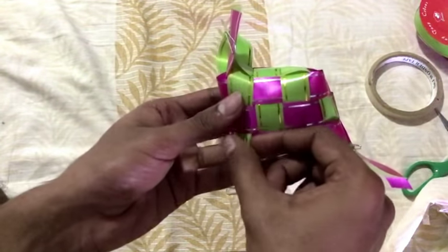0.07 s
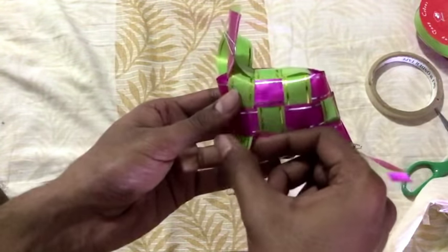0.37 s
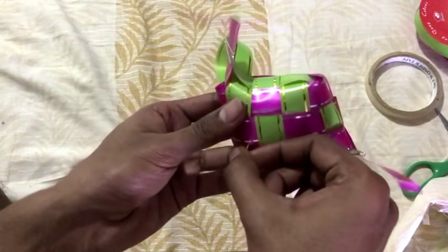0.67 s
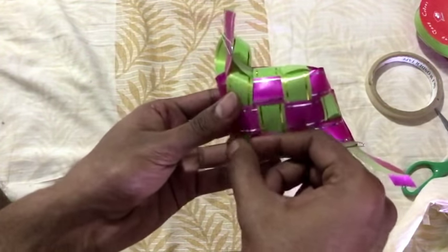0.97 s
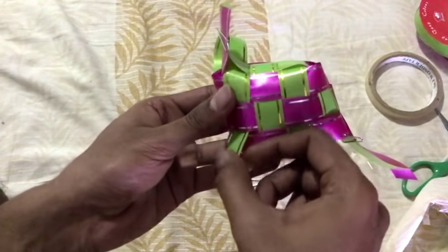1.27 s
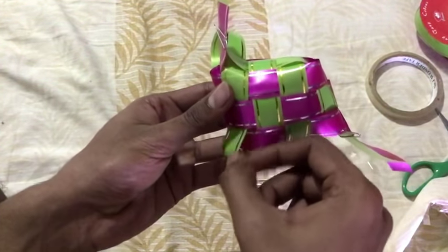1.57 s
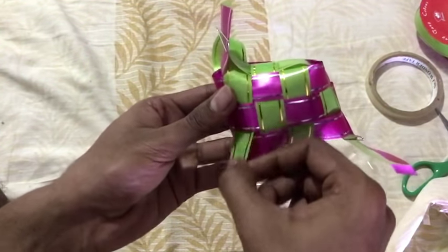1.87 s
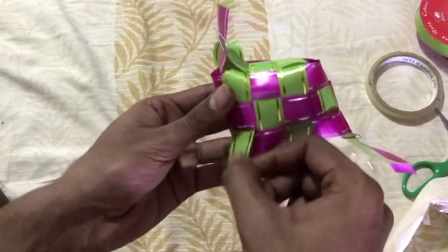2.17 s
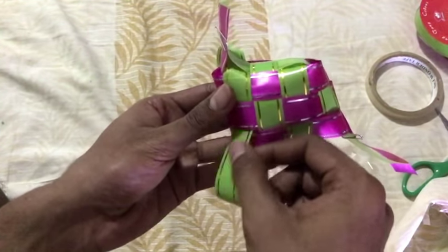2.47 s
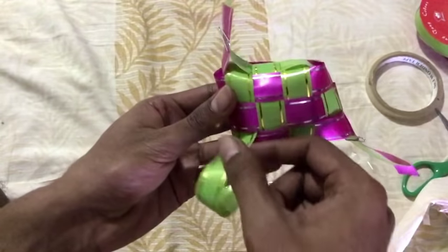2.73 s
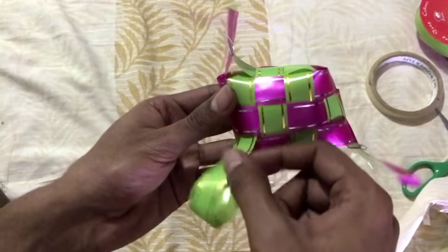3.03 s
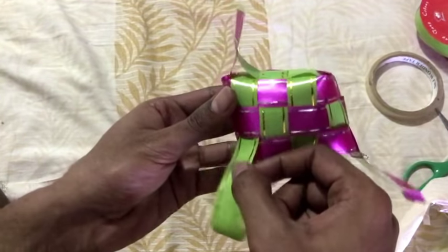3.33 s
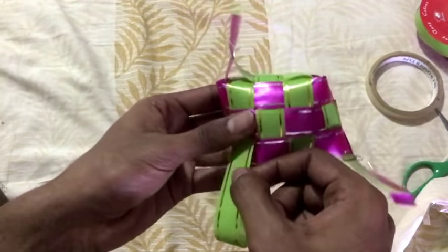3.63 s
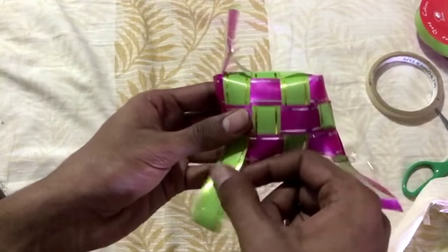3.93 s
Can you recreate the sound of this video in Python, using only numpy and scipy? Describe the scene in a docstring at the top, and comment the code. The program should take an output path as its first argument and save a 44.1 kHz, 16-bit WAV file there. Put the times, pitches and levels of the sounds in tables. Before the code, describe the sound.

Stiff plastic ribbon swishes and snaps as it is pulled through a small woven pouch.

```python
"""First come light brushes and dry snaps of plastic, over the rumble, hum and hiss of a quiet room.
Fingers are handling a small woven ribbon pouch, close by. After about a second they start to pull
a stiff plastic ribbon through it, six times. Each pull is a swish of tiny slips, coloured by the
hollow weave. The strips snap as they buckle, and their glossy faces hiss and faintly squeak."""
import sys
import numpy as np
from scipy import signal
from scipy.fft import rfft, irfft, next_fast_len
from scipy.io import wavfile
from scipy.ndimage import uniform_filter1d, map_coordinates

SR = 44100
rng = np.random.default_rng(int(sys.argv[2]) if len(sys.argv) > 2 else 0)


def log_audio(samples):
    """Write samples as a 16-bit WAV file to the path given in sys.argv[1]."""
    # one column per channel
    frames = np.atleast_2d(samples).T
    # limit to full scale, then quantise
    limited = np.clip(frames, -1, 1)
    pcm = np.round(limited * 32767).astype(np.int16)
    wavfile.write(sys.argv[1], SR, pcm)


N = 176400  # 4 seconds


def amp(db):
    return 10 ** (np.asarray(db) / 20)


def unit(x):
    return x / np.sqrt(np.mean(x ** 2) + 1e-20)


def colour(points):
    """Join (Hz, dB) points into a gain for every frequency."""
    f, db = np.transpose(points)
    return lambda hz: amp(np.interp(np.log(hz + 1), np.log(f + 1), db))


def curve(rows):
    """Join (seconds, value) points with straight lines."""
    return np.interp(np.arange(N) / SR, *np.transpose(rows))


def wobble(rate):
    """A smooth curve through `rate` random values a second."""
    return map_coordinates(rng.standard_normal(int(N * rate / SR) + 4), [np.arange(N) * rate / SR])


def swell(start, length):
    """One smooth rise and fall."""
    return np.sin(np.pi * np.clip((np.arange(N) / SR - start) / length, 0, 1))


def tone(hz):
    """A pure tone that follows a pitch curve."""
    return np.sqrt(2) * np.sin(2 * np.pi * np.cumsum(hz) / SR)


def filtered(x, response):
    """Turn each frequency up or down by response(hz)."""
    size = next_fast_len(len(x) + 8192)
    return irfft(rfft(x, size) * response(np.fft.rfftfreq(size, 1 / SR)), size)[:len(x)]


def noise(points):
    """Noise shaped by (Hz, dB) points."""
    return unit(filtered(rng.standard_normal(N), colour(points)))


def add(track, start, sound):
    """Mix a sound in at `start` seconds."""
    part = track[max(round(start * SR), 0):][:len(sound)]
    part += sound[:len(part)]


# A deep throb. Each row: time in seconds, pitch in Hz, level in dB before the bass cut.
THROB_PATH = [(0, 41.64, -41), (.65, 40.5, -57), (1.05, 37.7, -38), (1.3, 38.57, -51), (2.2, 41.32, -55),
              (2.7, 37.93, -38.5), (3.15, 40.83, -45.5), (3.45, 51.7, -66), (3.62, 52.88, -41),
              (4, 56, -46)]
# The rumble's colour. Each row: frequency in Hz, relative level in dB.
RUMBLE_COLOUR = [(20, -37), (32, -32.5), (48, 7.5), (65, -2), (82, 2.5), (97, -9.5), (110, -6), (140, -23),
                 (240, -58.5)]
# Its rise and fall. Each row: time in seconds, level in dB before the bass cut.
RUMBLE_LOUDNESS = [(0, -39), (.6, -50.5), (1.0, -43.5), (1.65, -47), (2.2, -43.5), (2.75, -46), (3.2, -39),
                   (3.55, -42), (4, -47.5)]


def rumble(bass_cut_hz=40):
    """Deep noise and a wandering throb, with the lowest bass cut away."""
    path = np.array(THROB_PATH)
    throb_db = curve(path[:, [0, 2]]) + 1.3 * wobble(7.23)
    throb_hz = curve(path[:, [0, 1]]) + 1.53 * wobble(12)
    deep = amp(curve(RUMBLE_LOUDNESS)) * noise(RUMBLE_COLOUR) + amp(throb_db) * tone(throb_hz)
    return filtered(deep, lambda hz: 1 - 1 / (1 + (hz / bass_cut_hz) ** 10))


# The drone's rise and fall. Each row: time in seconds, level in dB.
DRONE_LOUDNESS = [(0, -49), (.9, -49.5), (1.5, -48), (2.6, -49), (3.1, -54), (4, -54)]
# Hum tones. Each row: pitch in Hz, level in dB compared with the drone.
HUM_TONES = [(123, -4), (146, -10.5), (196, -13.5), (388, -25)]
# Colours of the drone and hiss. Each row: frequency in Hz, relative level in dB.
DRONE_COLOUR = [(70, -64), (100, -0.5), (122, -0.5), (150, -0.5), (175, -15), (200, -11.5), (260, -19.5),
                (400, -24.5), (600, -50)]
HISS_COLOUR = [(100, -0.5), (250, 3.5), (400, -4), (550, -5), (1100, -8), (1800, -11.5), (3000, -17),
               (6000, -24), (10000, -43), (15500, -40)]


def hum_and_hiss(hiss_db=-58):
    """A low drone with wavering hum tones, and faint hiss."""
    hum = sum(amp(db + 2.2 * wobble(6)) * tone(hz + 3 * wobble(12)) for hz, db in HUM_TONES)
    return amp(curve(DRONE_LOUDNESS)) * (noise(DRONE_COLOUR) + hum) + amp(hiss_db) * noise(HISS_COLOUR)


def room_echo(x, fade_s=0.29, level_db=-14):
    """The short, weak echo of a furnished room."""
    t = np.arange(SR // 4) / SR
    tail = rng.standard_normal(len(t)) * amp(-60 * t / fade_s) * (t > .002)
    return amp(level_db) * signal.fftconvolve(x, tail / np.linalg.norm(tail))[:N]


# Where the hollow weave rings. Each row: frequency in Hz, width in Hz, relative level in dB.
WEAVE_PEAKS = [(1000, 170, 0.5), (1850, 253, 6.5), (2550, 300, -1.5), (3300, 370, -2), (4140, 400, -1.5),
               (5600, 640, -4), (6560, 370, -7), (9000, 1300, -3), (11470, 260, -8.5)]
# Sliding hiss. Each row: frequency in Hz, relative level in dB.
SLIDE_COLOUR = [(200, -35), (500, -15.5), (900, -17.5), (2000, -31.5), (4800, -18), (8000, -12),
                (10200, -15), (12500, -8), (16000, -14)]


def weave(hz):
    """The pouch's colour: ringing peaks on top of broad hiss."""
    peaks = sum(amp(db) ** 2 / (1 + ((hz ** 2 - centre ** 2) / (width * hz + 1)) ** 2)
                for centre, width, db in WEAVE_PEAKS)
    return np.sqrt(peaks + colour(SLIDE_COLOUR)(hz) ** 2)


def flexing(x, depth_db=1.6):
    """The colour of the rubbing drifts as the weave flexes."""
    bands = signal.stft(x, nperseg=256)[2]
    drift = uniform_filter1d(rng.standard_normal(bands.shape), size=4, axis=0)  # smooth over pitch
    drift = uniform_filter1d(drift, size=16, axis=1)  # and over time
    return signal.istft(bands * amp(depth_db * unit(drift)), nperseg=256)[1][:N]


def friction(slips_per_s, spread, split_hz=5000):
    """Sticking and slipping makes tiny uneven ticks. Returns their body and their treble."""
    slips = (rng.random(N) < slips_per_s / SR) * np.exp(spread * rng.standard_normal(N))
    slips *= rng.choice([-1, 1], N)
    smooth_hiss = .5 * rng.standard_normal(N)
    rub = unit(flexing(filtered(unit(slips) + smooth_hiss, weave)))
    body = filtered(rub, lambda hz: 1 / (1 + (hz / split_hz) ** 2))
    return body, rub - body


def grip_rustle(level_db=-73):
    """The pouch rustles faintly in the grip all the time."""
    body, treble = friction(slips_per_s=810, spread=0.41)
    return amp(level_db + 4.6 * wobble(12)) * (body + treble)


# Bright hisses. Each row: start in seconds, length in seconds, level in dB, centre in Hz.
GLOSS_HISSES = [(1.325, 0.064, -66, 14000), (1.522, 0.092, -59, 12600), (2.243, 0.093, -58, 11300),
                (2.917, 0.046, -55, 12320)]
# Squeaks. Each row: start in seconds, length in seconds, pitch in Hz, level in dB.
GLOSS_SQUEAKS = [(3.33, 0.21, 2590, -72.5), (3.38, 0.13, 2966, -76), (3.601, 0.12, 11830, -73)]


def glossy_faces(half_width_hz=2200, pitch_waver=.006):
    """Glossy ribbon faces hiss as they slide, and squeak when they catch."""
    out = np.zeros(N)
    for start, length, db, centre in GLOSS_HISSES:
        band = filtered(rng.standard_normal(N), lambda hz: 1 / (1 + ((hz - centre) / half_width_hz) ** 4))
        out += amp(db) * swell(start, length) * unit(band)
    for start, length, hz, db in GLOSS_SQUEAKS:
        loudness = amp(db + 2 * wobble(80)) * swell(start, length)
        out += loudness * tone(hz * (1 + pitch_waver * wobble(300)))
    return out


# Light brushes. Each row: start in seconds, length in seconds, level in dB, brightness in dB.
BRUSH_STROKES = [(0.025, 0.097, -59.5, 0), (0.224, 0.12, -57.5, -4), (0.341, 0.063, -57, -5),
                 (0.414, 0.081, -59, 1), (0.537, 0.11, -67.5, -12), (0.706, 0.023, -54.5, 1),
                 (0.952, 0.039, -62.5, 15), (1.051, 0.028, -61, -9), (1.308, .13, -64.5, 6),
                 (1.488, 0.025, -59, -2), (1.686, 0.018, -52.5, 0), (1.716, 0.11, -63.5, 1),
                 (2.042, 0.033, -56.5, 0), (2.07, 0.067, -59.5, 2), (2.37, 0.042, -58.5, 5),
                 (2.455, 0.031, -57, 3), (2.468, 0.072, -65.5, 2), (2.722, 0.039, -62.5, 6),
                 (2.8, .1, -65, 7), (3.019, 0.027, -55, 4), (3.082, 0.042, -58.5, 1),
                 (3.152, 0.014, -60.5, -6), (3.263, 0.11, -60, -7), (3.411, .08, -61, 1),
                 (3.677, 0.048, -64.5, -13), (3.758, 0.047, -60.5, -4), (3.9, .15, -60.5, 0)]


def brushes():
    """Fingers and loose ends rub the weave in soft swells."""
    body, treble = friction(slips_per_s=2200, spread=0.48)
    out = np.zeros(N)
    for start, length, db, bright_db in BRUSH_STROKES:
        tilt = amp(bright_db / 2)
        out += amp(db) * swell(start, length) * (body / tilt + treble * tilt)
    return out * amp(2.2 * wobble(90))


def sharpest_click(points, size=512):
    """A click of this colour with its energy packed at the start (minimum phase)."""
    cepstrum = irfft(np.log(colour(points)(np.fft.rfftfreq(size, 1 / SR))))
    cepstrum[1:size // 2] *= 2
    cepstrum[size // 2 + 1:] = 0
    return irfft(np.exp(rfft(cepstrum)))


def snap_sized(x, span_s=.005):
    """Give x the energy of a level-1 sound lasting span_s."""
    return x * np.sqrt(span_s * SR) / np.linalg.norm(x)


def crinkle(t, points, fade_s, fold_share=.7):
    """One sharp click, then a fading trail of tiny folds."""
    folds = rng.laplace(size=len(t)) * amp(-60 * t / fade_s) * (t > .0003)
    kicks = (t == 0) + fold_share * folds / np.linalg.norm(folds)
    return snap_sized(np.convolve(kicks, sharpest_click(points))[:len(t)])


# Snaps. Each row: start in seconds, pitch in Hz, then ring, crack and fizz levels in dB before boosts.
BUCKLES = [(0.0631, 1780, -51, -63.5, -62.0), (0.2449, 1680, -48, -48.5, -57.5),
           (0.258, 1840, -50, -48.5, -49.5), (0.2738, 1790, -54, -64, -66),
           (0.2927, 1850, -43.5, -45, -58.0), (0.3751, 2570, -55.5, -56, -62),
           (0.5598, 1870, -52.5, -55.5, -59), (0.689, 1900, -44.5, -57.0, -67),
           (0.8088, 2560, -53, -52, -63), (0.8695, 2060, -52, -49.5, -56.5), (0.988, 1920, -54, -64, -63),
           (1.003, 2590, -53.0, -60, -58), (1.306, 1900, -42, -47.5, -59.5), (1.6935, 1740, -60, -63, -60),
           (1.7269, 1760, -48.5, -47.5, -47.0), (1.747, 1670, -63.0, -60, -66),
           (1.8848, 1860, -40.5, -39.5, -52), (2.0633, 2460, -59, -65, -58), (2.124, 1870, -62, -66, -58.5),
           (2.2632, 1748, -43.5, -44, -47.5), (2.4649, 1770, -58, -57.5, -58),
           (2.681, 1700, -50.5, -64, -54), (2.7282, 1850, -57.0, -59.0, -58),
           (2.8092, 1560, -58.5, -60.5, -57.5), (2.9026, 1690, -52.5, -63.0, -60),
           (3.0191, 1780, -49, -58, -69), (3.027, 2720, -52.5, -49, -54.5), (3.0837, 1880, -45, -50, -59),
           (3.1605, 1830, -65, -64.5, -67), (3.2582, 2220, -62.0, -63, -58),
           (3.2896, 1796, -46.5, -56.0, -56.5), (3.3139, 1800, -55, -54, -64),
           (3.3397, 1820, -50, -49.5, -54.5)]
# Colours of the crack and the higher fizz. Each row: frequency in Hz, relative level in dB.
CRACK_COLOUR = [(150, -63), (400, -36), (750, -21), (1200, -13), (1700, -11.5), (2400, 1), (3200, -0.5),
                (4200, -1), (6000, -4.5), (8000, -13), (12000, -31.5)]
FIZZ_COLOUR = [(500, -64), (4000, -27), (7500, 2.5), (11000, 3), (16000, -2)]
# A tap. Each row: start in seconds, pitch in Hz, peak in dB, seconds to fade by 60 dB.
FINGER_TAPS = [(3.2577, 799, -39.5, 0.011)]


def snaps_and_tap(ring_boost_db=1.5, fizz_boost_db=2.5, ring_rise_s=0.00048, ring_fade_s=0.0073):
    """Strips buckle with a crack, a fizz and a brief ring; a fingertip taps the pouch once."""
    out, t = np.zeros(N), np.arange(SR // 40) / SR
    for start, hz, ring_db, crack_db, fizz_db in BUCKLES:
        # two weaker tones, one below the pitch and one above
        side_hz = hz * (1 + np.array([-0.3, 0.3]) * rng.uniform(0.51, 1, 2))
        tones = np.sin(2 * np.pi * hz * t) + amp(-8.5) * np.sin(2 * np.pi * np.outer(side_hz, t)).sum(0)
        ring = snap_sized(tones * amp(-60 * t / ring_fade_s) * (1 - np.exp(-t / ring_rise_s)))
        crack = amp(crack_db) * crinkle(t, CRACK_COLOUR, fade_s=0.013)
        fizz = amp(fizz_db + fizz_boost_db) * crinkle(t, FIZZ_COLOUR, fade_s=0.016)
        add(out, start, amp(ring_db + ring_boost_db) * ring + crack + fizz)
    for start, hz, db, fade_s in FINGER_TAPS:
        add(out, start, amp(db - 60 * t / fade_s) * np.sin(2 * np.pi * hz * t))
    return out


# Pulls through the weave. Each row: start and length in seconds, level in dB,
# rise and fall in seconds, brightness at mid-pull in dB.
RIBBON_PULLS = [(1.122, 0.21, -52.5, 0.091, 0.074, -4.5), (1.512, 0.09, -52, 0.052, 0.028, -2),
                (1.884, 0.16, -50, 0.0053, 0.089, 0), (2.211, 0.17, -48.5, 0.029, 0.055, 2),
                (2.551, 0.17, -47.5, 0.027, 0.06, -1), (2.895, .14, -50, 0.018, 0.052, -1.5)]


def pulls(dulling_db=7.5):
    """The ribbon speeds up, slides and slows; its swish dulls towards the end."""
    body, treble = friction(slips_per_s=7000, spread=.42)
    out, t = np.zeros(N), np.arange(N) / SR
    for start, length, db, rise, fall, bright_db in RIBBON_PULLS:
        speed = np.clip((t - start) / rise, 0, 1) * np.clip((start + length - t) / fall, 0, 1)
        progress = np.clip((t - start) / length, 0, 1)
        tilt = amp((bright_db - dulling_db * (progress - .5)) / 2)
        out += amp(db) * speed * (body / tilt + treble * tilt)
    return out * amp(0.29 * wobble(70))


def scene():
    """The ribbon, its echo and the room behind it, in one channel."""
    ribbon = pulls() + brushes() + grip_rustle() + glossy_faces() + snaps_and_tap()
    return (ribbon + room_echo(ribbon) + rumble() + hum_and_hiss())[None]


def record(dry):
    """Cut away the very highest treble."""
    return np.array([filtered(x, lambda hz: hz < 15850) for x in dry])


dry = scene()
out = record(dry)
log_audio(out)
```